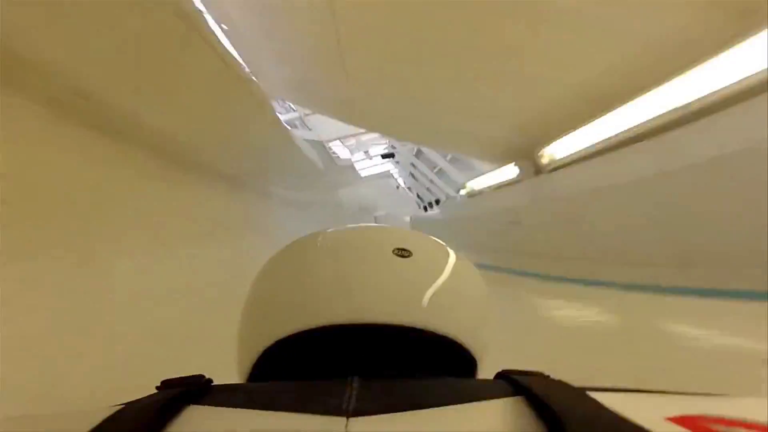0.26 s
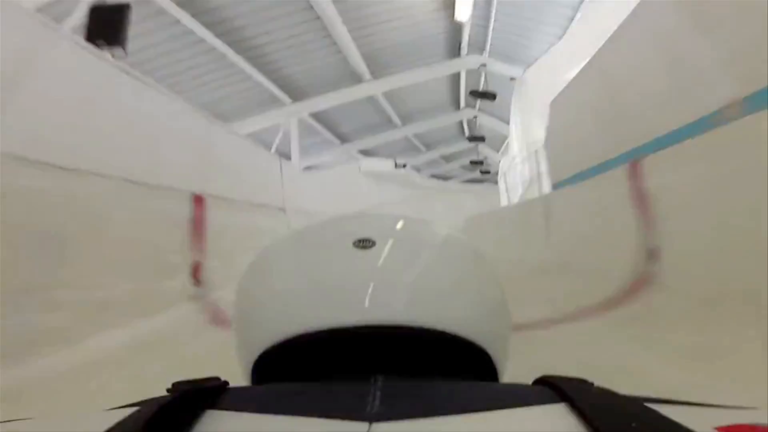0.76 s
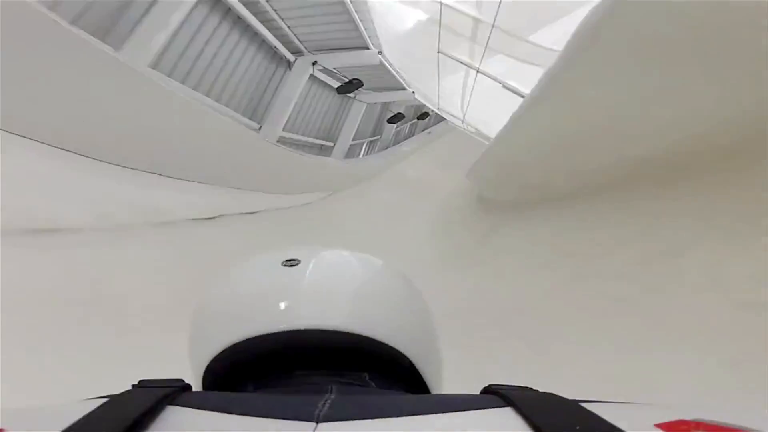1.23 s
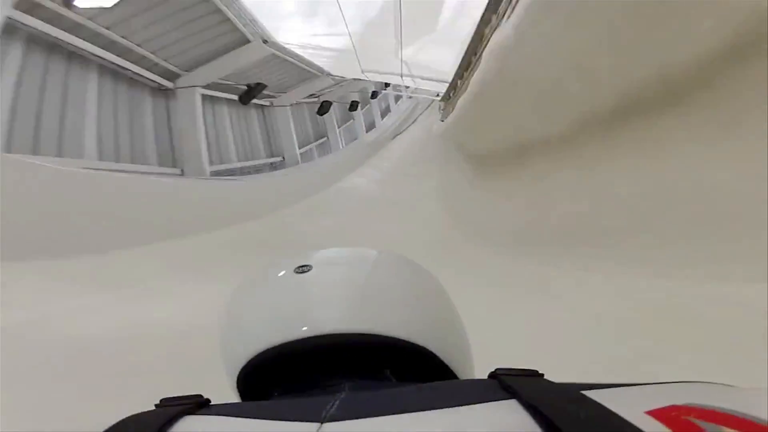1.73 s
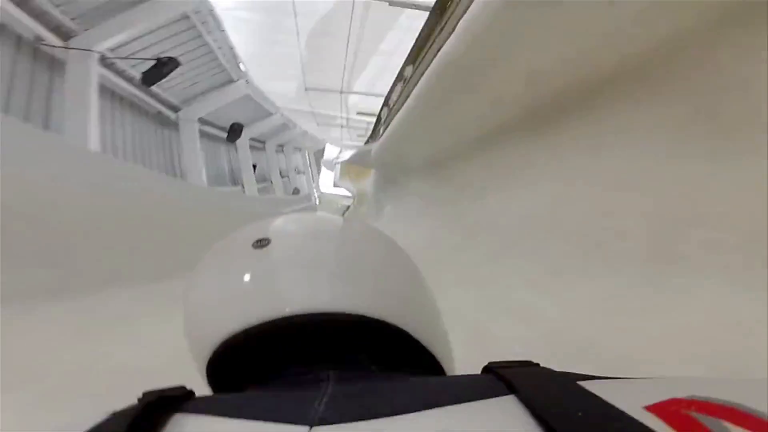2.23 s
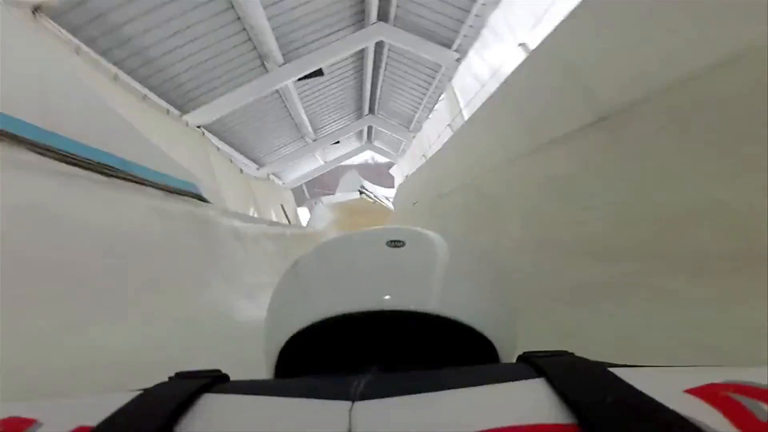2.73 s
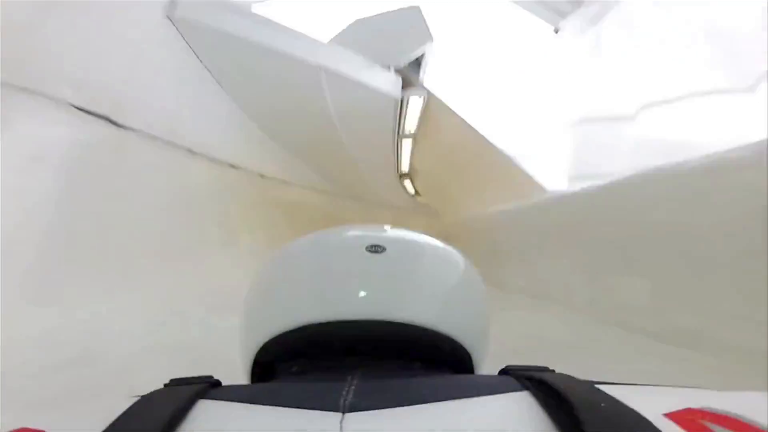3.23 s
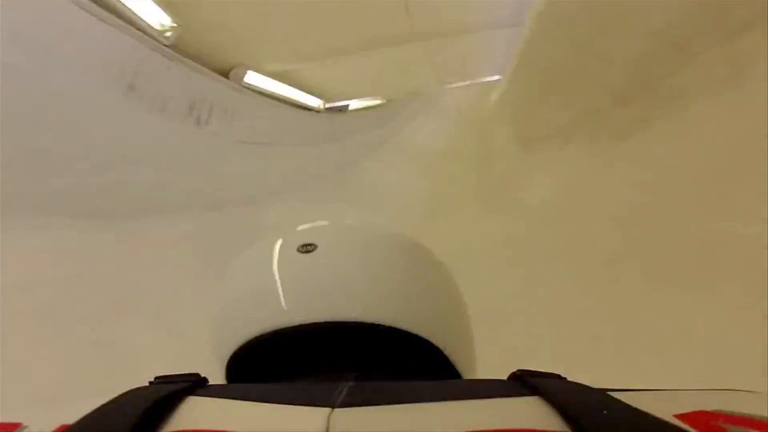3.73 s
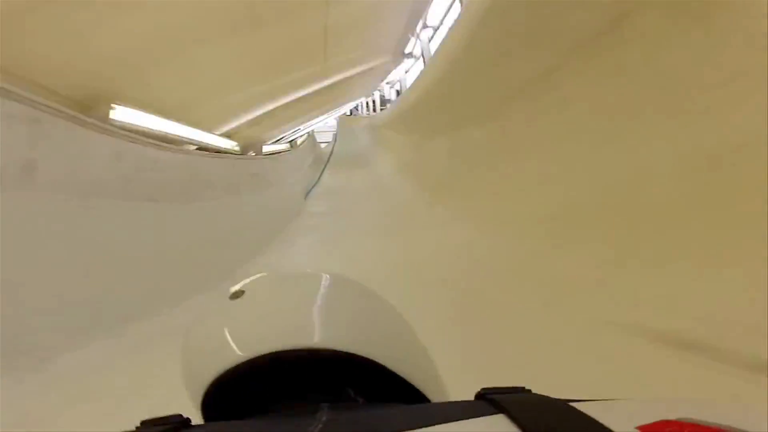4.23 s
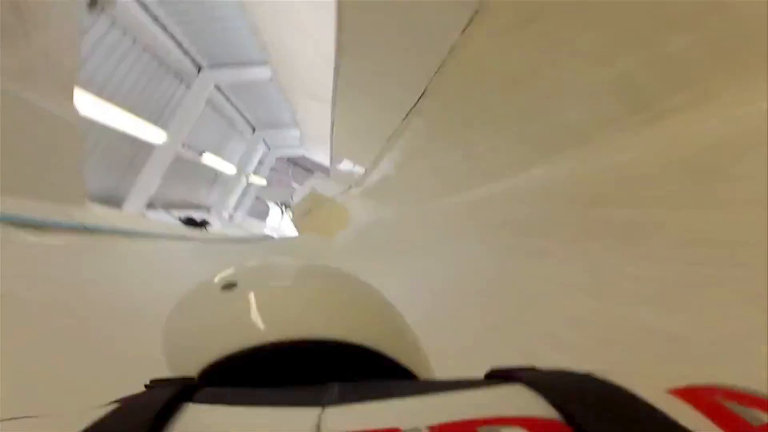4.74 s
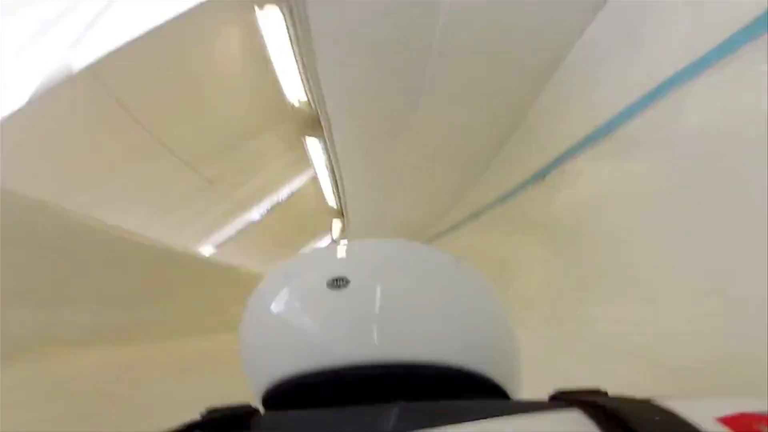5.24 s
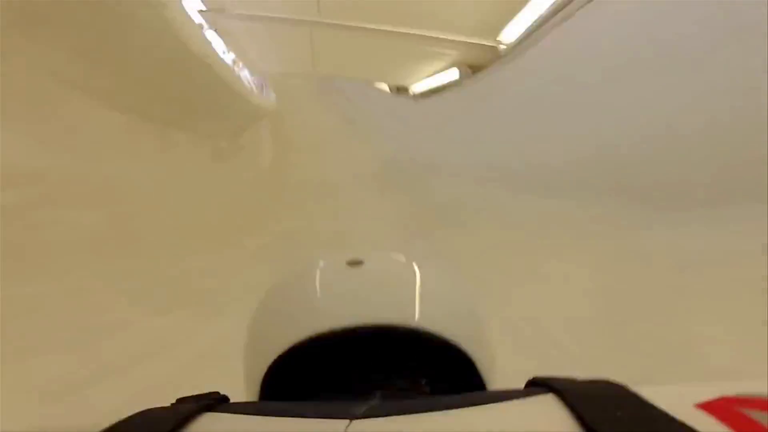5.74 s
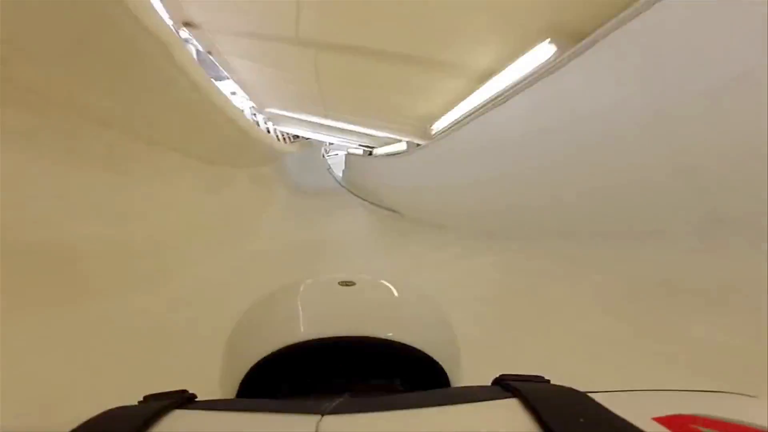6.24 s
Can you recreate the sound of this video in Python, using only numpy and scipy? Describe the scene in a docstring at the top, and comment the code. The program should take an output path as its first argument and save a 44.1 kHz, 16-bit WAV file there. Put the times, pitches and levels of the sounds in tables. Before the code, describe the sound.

A sled speeds down an ice track, heard from a microphone on the rider's back. Steel runners scrape with a gritty, juddering hiss over a loud low rumble, and gusts of wind buffet the microphone. Bumps in the ice add dull thuds while the microphone mount rattles and clacks irregularly. At a few hard jolts, a sharp clack makes the noise dip briefly before the hiss swells back.

```python
"""Skeleton sled on an ice track

Heard from a small camera housing on the rider's back. Steel runners scrape and judder over the ice,
the rough track and its bumps shake the sled, and turbulent air buffets the housing.
The camera mount rattles, and clacks at hard jolts; each loud clack pushes the limiter down,
and the hiss swells back."""
import sys
import numpy as np
from scipy import signal
from scipy.fft import rfft, irfft
from scipy.io import wavfile
from scipy.ndimage import uniform_filter1d, minimum_filter1d

SR = 44100
rng = np.random.default_rng(int(sys.argv[2]) if len(sys.argv) > 2 else 0)


def waveform_to_disk(signal):
    """Save audio, clipped to [-1, 1], as 16-bit WAV at the path in sys.argv[1]."""
    frames = np.transpose(np.atleast_2d(signal))
    scaled = np.clip(frames, -1, 1) * 32767
    samples = np.round(scaled).astype(np.int16)
    wavfile.write(sys.argv[1], SR, samples)


N = 286209


def from_db(db):
    """Amplitude ratio of a level in decibels."""
    return 10 ** (np.asarray(db) / 20)


def rms_one(x):
    """Normalisation to an rms of 1."""
    return x / np.sqrt(np.mean(x ** 2) + 1e-20)


def in_time(rows):
    """Linear interpolation of each column of a curve, at every sample."""
    times, *columns = np.transpose(rows)
    return [np.interp(np.arange(N) / SR, times, column) for column in columns]


def colour(x, spectrum):
    """Spectral shaping by a smooth curve that falls 12 dB per octave beyond its ends."""
    hz, db = np.transpose(spectrum)
    f = np.maximum(np.arange(N // 2 + 1) * SR / N, 1)
    gain = from_db(np.interp(np.log(f), np.log(hz), db))
    outside = np.minimum(f / hz[0], 1) * np.minimum(hz[-1] / f, 1)
    return irfft(rfft(x) * gain * outside ** 2, N)


def drift(rate_hz):
    """Random fluctuation of rms 1, mostly slower than rate_hz."""
    f = np.arange(N // 2 + 1) * SR / N
    band = f / (f + 2) / (1 + (f / rate_hz) ** 2)
    return rms_one(irfft(rfft(rng.standard_normal(N)) * band, N))


def lumpy_noise(spectrum, lump_db, rate_hz, swing):
    """Random amplitude modulation of noise, with soft saturation of the largest swings; rms 1."""
    noise = colour(rng.standard_normal(N), spectrum)
    analytic = signal.hilbert(rms_one(noise * from_db(lump_db * drift(rate_hz))))
    return rms_one(analytic.real / (1 + (np.abs(analytic) / swing) ** 4) ** .25)


# spectrum of the buffeting: (frequency [Hz], relative level [dB])
WIND_SPECTRUM = [(14, 4.5), (25, -0.5), (45, 0.5), (70, 0), (100, 2), (200, -13), (400, -32)]
# the headwind, which drops in the lee of the first long curve: (time [s], level [dB])
HEADWIND_LEVEL = [(0, -27.5), (.7, -21.5), (1.4, -39), (2.1, -22.5), (2.9, -29), (3.7, -24.5), (4.5, -24),
                  (5.7, -24.5), (6.49, -23.5)]
# gusts into and out of the curves: (time [s], level above the headwind [dB])
CURVE_GUSTS = [(.72, 7), (3.12, 3.5), (3.72, 5.5), (5.34, 10.5), (6.18, 10.5)]
def wind(gust_s=0.092):
    """Turbulence: pressure fluctuations buffet the housing and swell with each gust."""
    t = np.arange(N) / SR
    headwind_db, = in_time(HEADWIND_LEVEL)
    gust_db = sum(db * np.exp(-((t - s) / gust_s) ** 2) for s, db in CURVE_GUSTS)
    buffeting = lumpy_noise(WIND_SPECTRUM, lump_db=5.0, rate_hz=19, swing=5.7)
    return from_db(headwind_db + gust_db) * buffeting


# spectrum of the sled's vibration: (frequency [Hz], relative level [dB])
RUMBLE_SPECTRUM = [(50, -1.5), (85, -3), (125, 1), (165, -2), (205, -8), (290, -11.5), (400, -20.5),
                   (550, -28), (900, -30.5)]
# rumble from track roughness, eased in the banked curves: (time [s], relative level [dB])
ROUGHNESS = [(0, -26), (.3, -23.5), (.65, -20), (1.05, -17.5), (1.3, -23.5), (1.5, -22.5), (1.63, -18.5),
             (2, -21.5), (2.4, -19), (3.3, -17), (3.62, -22.5), (3.85, -20.5), (4.6, -28), (4.95, -17),
             (5.12, -25), (5.35, -18.5), (5.9, -24), (6.49, -20.5)]
def rumble():
    """Forced vibration: the rough track shakes the sled at low frequencies."""
    level_db, = in_time(ROUGHNESS)
    return from_db(level_db + 0.8) * lumpy_noise(RUMBLE_SPECTRUM, lump_db=2.0, rate_hz=24, swing=6.1)


# big bumps in the ice: (time [s], relative peak level [dB], frequency [Hz], envelope half-width [s])
ICE_BUMPS = [(0.377, -7.5, 142, 0.01), (.49, -5.5, 151, 0.025), (1.019, -9, 118, 0.017),
             (1.64, -9, 129, 0.023), (2.09, -12, 88, 0.015), (2.305, -10, 127, 0.031),
             (2.519, -6, 116, 0.017), (2.712, -6.5, 100, 0.027), (2.755, 3, 132, 0.018),
             (2.943, -2, 144, 0.0059), (3.041, -5.5, 138.5, 0.0087), (3.105, -6.5, 100, .015),
             (3.226, -7, 142, 0.016), (3.285, -7, 125, .019), (3.472, -5.5, 113, .012),
             (3.569, -7, 125, .021), (4.759, -5.5, 121, 0.01), (4.94, -5.5, 120, 0.016),
             (5.0, 1.5, 130, .005), (5.32, -6.5, 130, 0.029)]
def bumps():
    """Transient vibration: each bump swings sled and rider for a few cycles in a Gaussian envelope."""
    out, t = np.zeros(N), np.arange(N) / SR
    for (s, db, hz, half_width_s), phase in zip(ICE_BUMPS, rng.random(len(ICE_BUMPS))):
        near = np.abs(t - s) < 2 * half_width_s
        since = t[near] - s
        envelope = from_db(db) * np.exp(-2 * (since / half_width_s) ** 2)
        out[near] += envelope * np.sin(2 * np.pi * (hz * since + phase))
    return out


# resonances and dips of the housing: (frequency [Hz], bandwidth [Hz], gain [dB])
HOUSING_RESPONSE = [(677, 217, 9.5), (873, 165, -3), (1191, 536, 14.5), (1898, 596, 9.5), (2316, 554, 10.5),
                    (2647, 130, 7.5), (3090, 580, -5), (3427, 310, 7), (5500, 600, 3.5), (6034, 547, -31),
                    (6470, 790, 9.5), (8520, 280, 8.5), (8780, 210, -4.5), (9790, 1400, 17.5),
                    (10850, 830, 11), (11400, 770, -26.5), (12900, 380, -4), (13400, 460, 9.5),
                    (14400, 1230, 19)]
def housing(x):
    """Resonance and antiresonance: the plastic shell rings at some frequencies and blocks others."""
    for hz, width_hz, db in HOUSING_RESPONSE:
        tuning = -2 * np.cos(2 * np.pi * hz / SR)
        damping, gain = np.tan(np.pi * width_hz / SR), from_db(db / 2)
        numerator = [1 + damping * gain, tuning, 1 - damping * gain]
        denominator = [1 + damping / gain, tuning, 1 - damping / gain]
        x = signal.lfilter(numerator, denominator, x + 1e-18)
    return x


def damped_mode(t, phase, hz, rise_s):
    """Damped oscillation: a mode swells until rise_s, then dies away."""
    envelope = (t / rise_s * np.exp(1 - t / rise_s)) ** 2
    return envelope * np.sin(2 * np.pi * (hz * t + phase))


def mount_impacts(rows, length_s, attack_s, tail, crunch, crunch_hz, sag):
    """Impact excitation: three modes of the mount ring, with a gritty crunch through the housing."""
    out, t = np.zeros(N + SR), np.arange(SR // 40) / SR
    # full force while the parts touch, then a weaker dying ring
    attack = 1 - np.exp(-(t / attack_s) ** 2)
    contact = attack * ((1 - tail) * np.exp(-(t / length_s) ** 4) + tail * np.exp(-t / length_s))
    noises = rng.standard_normal((len(rows), len(t)))
    grits = housing(signal.lfilter(*signal.butter(1, crunch_hz, fs=SR), noises * contact))
    for (s, db, hz, bright_db), phases, grit in zip(rows, noises[:, :3], grits):
        # the ring sinks a little as the contact loosens
        pitch = hz * (1 + sag * (np.exp(-2 * t / length_s) - np.exp(-1)))
        ring = contact * np.sin(2 * np.pi * (np.cumsum(pitch) / SR + phases[0]))
        # harder jolts put more of their force into the ring, less into hollow knock and thin tick
        yield_db = 0.55 * max(db, 0)
        knock = from_db(-14 - bright_db - yield_db) * damped_mode(t, phases[1], hz=670, rise_s=.0024)
        tick = from_db(-12.5 + bright_db - yield_db) * damped_mode(t, phases[2], hz=3696, rise_s=.00092)
        grit_gain = crunch * from_db(0.23 * bright_db) * np.std(ring)  # bright clacks are grittier
        clack = ring + knock + tick + grit_gain * rms_one(grit)
        # the harder the jolt, the more the swing is squashed against the mount's stops
        drive = np.clip(0.42 + db / 16, .3, 1.8)
        clack = np.tanh(drive * clack / np.abs(clack).max())
        start = max(round((s - length_s / 2) * SR), 0)
        out[start:start + len(t)] += from_db(db) * clack / np.abs(clack).max()
    return out[:N]


def rattle(count, peak_db, spread_db, bright_db):
    """Contact chatter: the mount ticks lightly at random times and pitches; few ticks are strong."""
    when, size, pitch, bright = rng.random((count, 4)).T
    level_db = peak_db - spread_db * np.sqrt(size)
    ring_hz = 1100 + 1400 * pitch
    rows = np.transpose([when * N / SR, level_db, ring_hz, bright_db * (2 * bright - 1)])
    return mount_impacts(rows, length_s=.0023, attack_s=.00022, tail=.37,
                         crunch=.79, crunch_hz=7000, sag=.1)


# hard jolts: (time [s], relative peak level [dB], ring frequency [Hz], brightness [dB])
# brightness raises the tick and lowers the knock
JOLTS = [(.077, -1.5, 1860, -8.5), (.112, -4.5, 2170, 13), (.226, -2.5, 2270, 11), (.386, -1, 1150, 8),
         (.519, -2.5, 1950, 2), (.566, 2, 1850, -2), (.615, 0.5, 1840, 2), (.626, -1, 1240, -6),
         (.702, 6.5, 1720, -4), (.772, 17, 1830, 7), (.794, 2, 1250, 1), (.979, 6.5, 1840, 0),
         (1.265, -2.5, 1784, 10), (1.691, -2.5, 1226, 8), (1.884, -1, 2120, 11), (2.042, -7, 1280, -15),
         (2.15, 4.5, 1300, -5), (2.311, -6, 1250, -16), (2.349, 1, 1940, 5), (2.424, 2, 1840, 8),
         (2.474, -0.5, 2100, 21), (2.58, -1.5, 2150, 15), (2.711, 6.5, 1630, -4), (2.75, 13.5, 1850, -3),
         (2.898, -2, 1780, -1), (3.086, -9, 1240, -19), (3.13, -1, 1950, 1), (3.349, 2.5, 1210, 8),
         (3.51, 6.5, 1800, 3), (3.562, 0, 1180, -4), (3.688, -6, 2220, 20), (3.709, 13, 1266, 5),
         (3.764, 3, 1290, -7), (4.053, -2.5, 1780, 8), (4.291, -1, 2180, 3), (4.328, -0.5, 1840, -4),
         (4.604, 0.5, 1100, 6), (4.678, 1.5, 1710, -6), (4.887, 4, 2300, 7), (4.949, 5, 1400, -8.5),
         (5.386, 4.5, 1910, -1), (5.45, -3, 1250, -4), (5.521, 6.5, 1930, -5), (5.595, -1, 1420, 3),
         (5.8, 4.5, 1840, 5), (5.967, 0.5, 1800, -1), (6.122, -4, 1230, -10), (6.189, 7, 1486, -9),
         (6.29, 5, 1890, 5), (6.453, 0.5, 2280, 4)]
def clacks():
    """Shock excitation: each hard jolt makes the mount clack for a few milliseconds."""
    return mount_impacts(JOLTS, length_s=.0035, attack_s=.00034, tail=.56,
                         crunch=1.0, crunch_hz=3800, sag=.19)


def ice_fractures(per_s, spread_db):
    """Brittle fracture: the ice gives random clicks, mostly small, a few large; rms 1."""
    sizes = from_db(spread_db * np.minimum(rng.exponential(1, N), 4))
    signs = rng.choice([-1, 1], N)
    breaks = rng.random(N) < per_s / SR
    return rms_one(sizes * signs * breaks)


# scrape of the runners as they press on the ice: (time [s], level [dB])
SCRAPE_LEVEL = [(0, -23.5), (.45, -21.5), (.8, -18.5), (1.35, -19.5), (1.57, -22), (1.8, -20.5),
                (3.1, -19.5), (4.5, -20), (4.95, -18), (5.6, -20), (6.49, -18)]
# how hard the edges bite: (time [s], gain of the runners' ring over the rest of the scrape [dB])
EDGE_BITE = [(0, -1), (1.5, 0.5), (2.4, -2), (3, 0.5), (3.6, -1), (4.25, 3.4), (4.95, 2.8), (5.55, -2),
             (6.49, 1)]
# spectra of scrape and ice spray before the housing: (frequency [Hz], relative level [dB])
SCRAPE_SPECTRUM = [(250, 12), (400, 6), (600, 0.5), (1000, -1), (2000, 0.5), (3500, 3.5), (5000, -8.5),
                   (8000, -15)]
SPRAY_SPECTRUM = [(2500, -2.5), (4000, 0.5), (5500, 11), (8000, -0.5), (11000, -8), (15000, -12.5)]
def runners(ring_band_hz=(2140, 3160), spray_db=-8):
    """Sliding friction: steel grinds over ice; juddering contact pressure drives scrape and spray."""
    scrape_db, = in_time(SCRAPE_LEVEL)
    bite_db, = in_time(EDGE_BITE)
    pressure = from_db(drift(rate_hz=42) + 1.13 * drift(rate_hz=200))
    fractures = ice_fractures(per_s=4000, spread_db=2.0)
    grinding = colour(fractures + 0.63 * rng.standard_normal(N), SCRAPE_SPECTRUM)
    flicker = from_db(0.21 * drift(rate_hz=72))
    scrape = rms_one(housing(grinding * pressure * flicker))
    hiss = colour(0.32 * fractures + rng.standard_normal(N), SPRAY_SPECTRUM)
    spray = rms_one(housing(hiss * pressure))
    # under load the steel rings more and the dull scrape gives way
    ring = signal.sosfilt(signal.butter(1, ring_band_hz, "band", fs=SR, output="sos"), scrape)
    scrape = ring * from_db(bite_db / 2) + (scrape - ring) * from_db(-bite_db / 2)
    return from_db(scrape_db) * (scrape + from_db(spray_db) * spray)


def scene():
    """Superposition: sled, mount, runners and wind add at one nearby microphone."""
    shaking = rumble()
    mount = from_db(0.24) * clacks() + rattle(count=80, peak_db=-11.0, spread_db=8.5, bright_db=2)
    return (shaking + mount + runners() + from_db(0.8) * bumps() + wind())[None]


def limiter(x, ceiling_db, release_s):
    """Peak limiting: the gain drops at once for peaks over the ceiling and recovers exponentially."""
    level_db = 20 * np.log10(np.abs(x).max(axis=0) + 1e-9)
    over_db = np.maximum(level_db - ceiling_db, 1e-6)
    age = np.arange(N) / SR / release_s
    held_db = np.exp(np.maximum.accumulate(np.log(over_db) + age) - age)
    # a millisecond of look-ahead rounds the attack
    return x * uniform_filter1d(minimum_filter1d(from_db(-held_db), size=45), size=45)


def record(dry):
    """Peak and band limiting: the camera holds the level down and cuts the highest treble."""
    limited = limiter(dry, ceiling_db=-3.5, release_s=0.14)
    cutoff_hz = 14950
    return signal.sosfilt(signal.ellip(10, .2, 80, cutoff_hz, fs=SR, output="sos"), limited)


dry = scene()
out = record(dry)
waveform_to_disk(out)
```